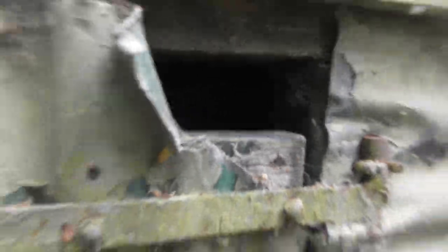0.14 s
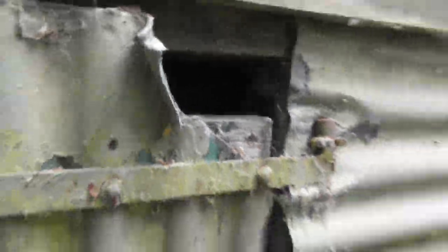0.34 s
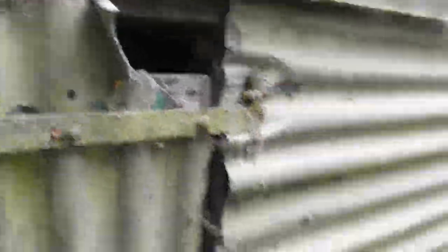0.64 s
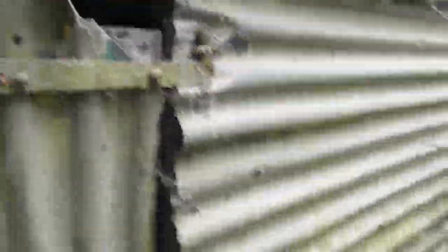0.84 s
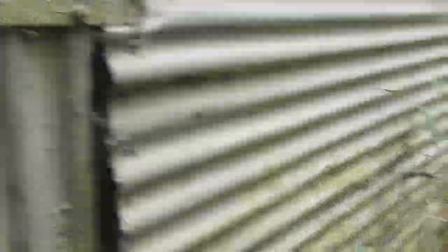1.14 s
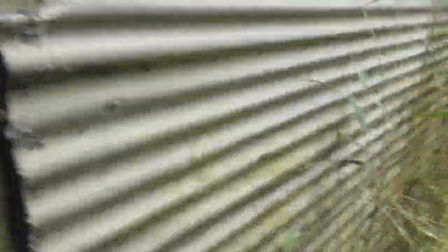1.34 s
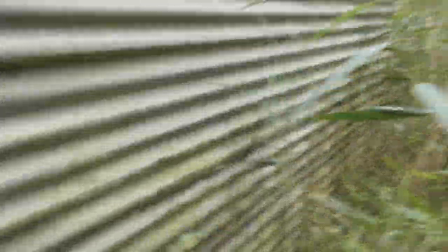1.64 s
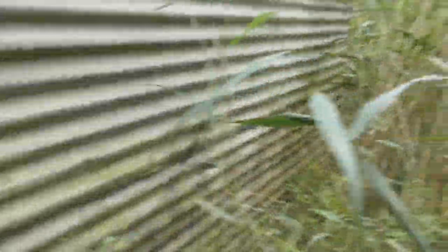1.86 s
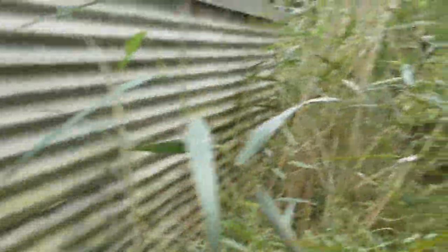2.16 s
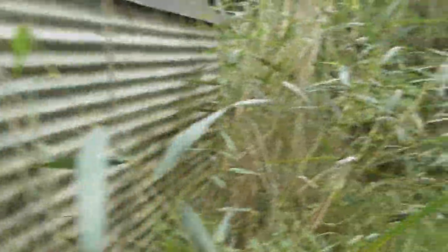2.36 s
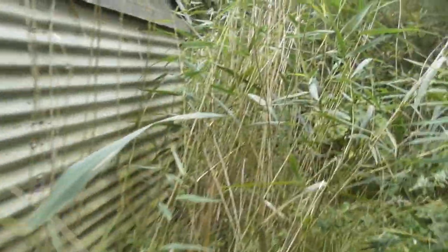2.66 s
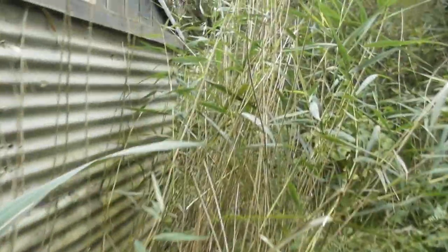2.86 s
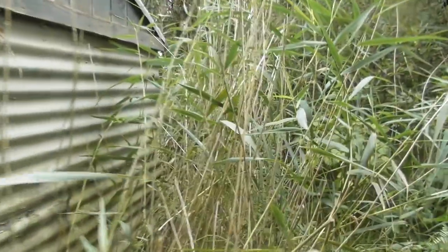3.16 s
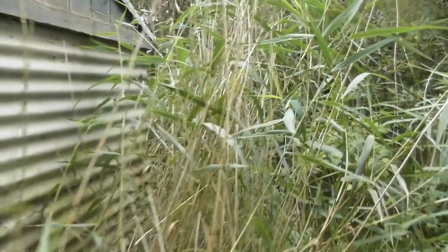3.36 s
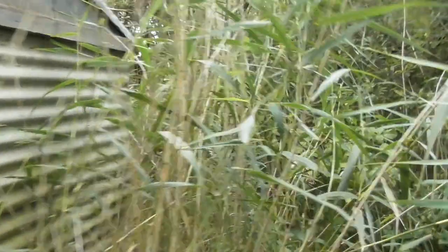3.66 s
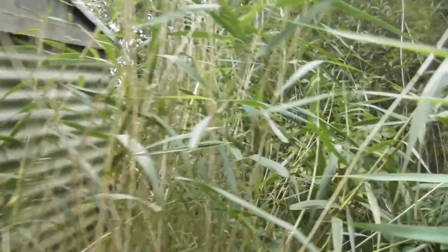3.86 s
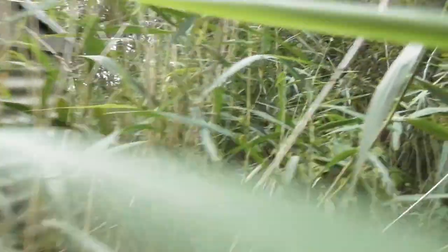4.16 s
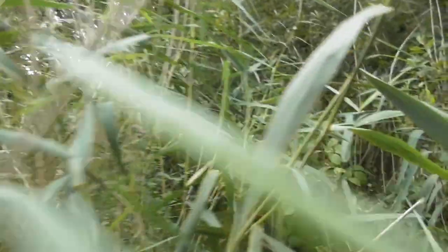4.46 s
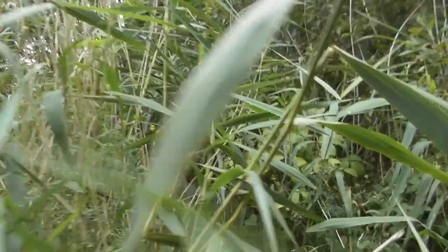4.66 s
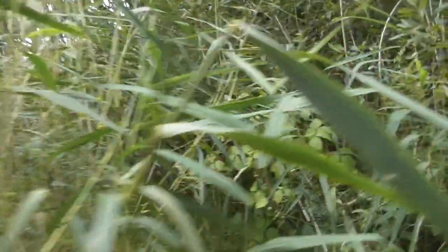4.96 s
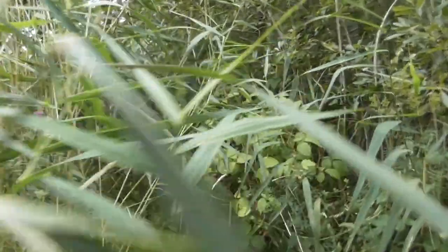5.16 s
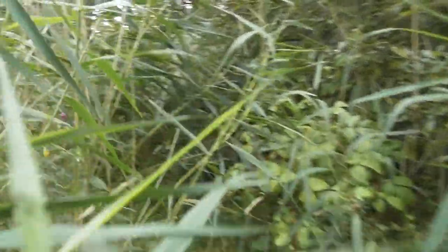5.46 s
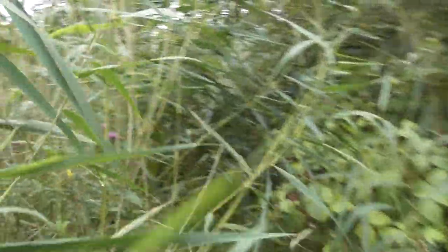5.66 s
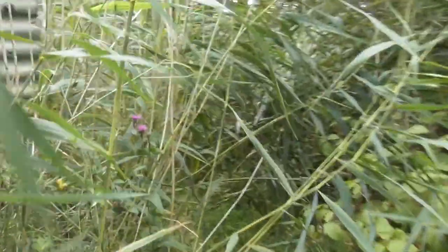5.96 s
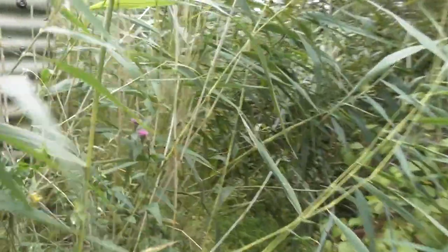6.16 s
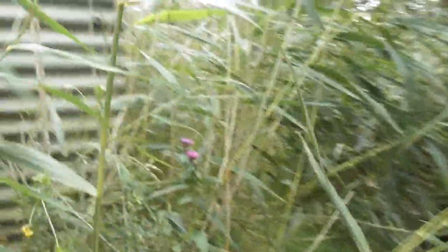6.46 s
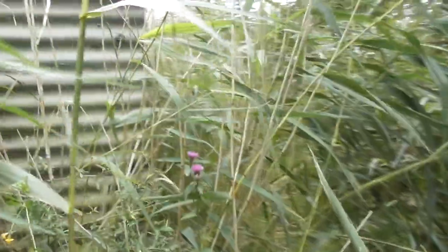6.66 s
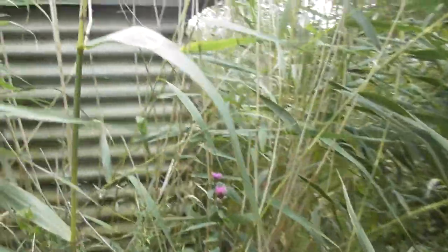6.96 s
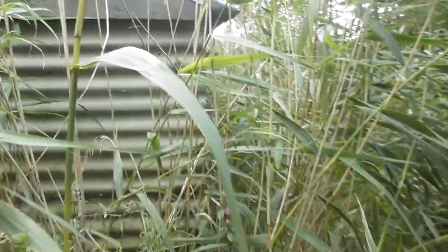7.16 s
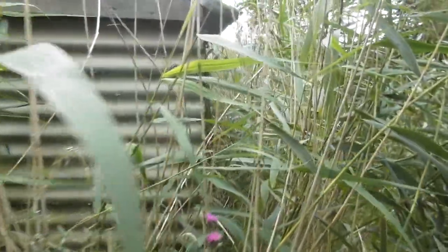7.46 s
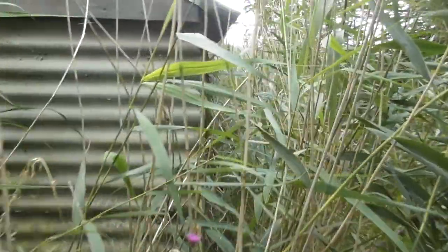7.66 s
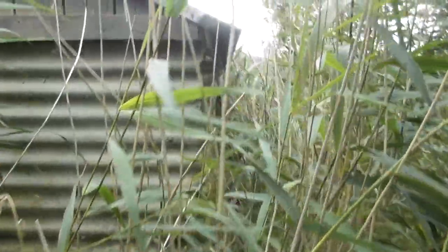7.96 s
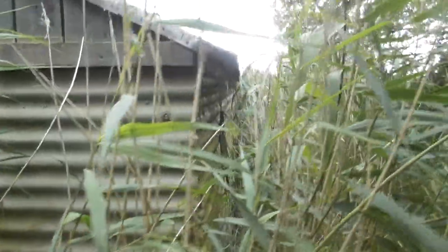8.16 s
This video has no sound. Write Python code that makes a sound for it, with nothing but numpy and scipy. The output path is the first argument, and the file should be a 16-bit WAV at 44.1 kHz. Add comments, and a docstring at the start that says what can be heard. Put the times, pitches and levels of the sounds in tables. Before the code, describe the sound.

Quiet wind wash and sparse clicks give way to dense, crisp reed rustling, with a burst of hard knocks and rumbling scrapes midway.

```python
"""Dry leaves rustle as someone wades through tall reeds: dense stick-slip impulses with leaf colours.
Ribbed blades rasp past, sheaths crackle, and dry leaves crack with damped pings.
Stalks tap the camera and excite its case modes; one drags across the housing, rumbling and groaning.
Beneath lies the soft wash of wind in distant plants: filtered noise whose level wavers."""
import sys
import numpy as np
from scipy import signal
from scipy.fft import rfft, irfft
from scipy.io import wavfile
from scipy.ndimage import uniform_filter1d

SR = 44100
rng = np.random.default_rng(int(sys.argv[2]) if len(sys.argv) > 2 else 0)


def unload_wav(signal):
    """Save mono or channel-first audio to the path in sys.argv[1] as 16-bit WAV at rate SR, clipped to [-1, 1]."""
    wavfile.write(
        sys.argv[1],
        SR,
        np.round(np.clip(np.atleast_2d(signal).T, -1, 1) * 32767).astype(np.int16),
    )


N = 366912
T, HZ = np.arange(N) / SR, np.fft.rfftfreq(N, 1 / SR)

# colour of hollow stems: (frequency [Hz], level [dB])
STEMS = [(100, 0), (200, 2), (400, 3), (750, 2), (1200, 0), (1650, -5.5), (2200, -1), (2900, -7.5),
         (4000, -2)]
# colour of leaf edges: (frequency [Hz], level [dB])
EDGES = [(8000, -26), (10000, -1.5), (11500, -6.5), (13500, -10.5), (16000, -12.5)]
# colour of a single ribbed blade: (frequency [Hz], level [dB])
BLADE = [(1500, -38), (1850, -5.5), (2350, -11.5), (2900, -18.5), (3900, -4), (5000, -6.5), (5700, 1),
         (7800, 8), (9000, 0.5), (10800, 0), (13900, -1.5), (16000, -11)]
# bright snap of a breaking or striking stalk: (frequency [Hz], level [dB])
SNAP = [(900, 15.5), (1550, -9), (2200, -9), (3000, -10.5), (3700, 3.5), (4600, -12.5), (7400, 3.5),
        (10000, -2.5), (16000, -7.5)]
# left port against the right; the sign flips while a stalk leans on the housing
FREE_POLARITY, PRESSED_POLARITY = 0.45, -0.3


def amp(db):
    """Level law: decibels to amplitude gain."""
    return 10 ** (np.asarray(db) / 20)


def evened(x):
    """Normalisation: scales a sound so that the mean of its channels has rms 1."""
    return x / np.sqrt(np.mean(x.mean(0) ** 2) + 1e-20)


def read(points):
    """Interpolation: each column of a table along log frequency."""
    hz, *columns = np.transpose(points)
    return [np.interp(np.log(HZ + 1), np.log(hz + 1), column) for column in columns]


def add(mix, s, sound):
    """Superposition: adds a sound to the mix at time s [s]."""
    part = mix[:, max(round(s * SR), 0):][:, :sound.shape[1]]
    part += sound[:, :part.shape[1]]


def wander(hz):
    """Low-passed noise: a slow random course of rms 1, with rates up to about hz."""
    x = irfft(rfft(rng.standard_normal(N)) / (1 + (HZ / hz) ** 4), N)
    return x / x.std()


def heard(drive, spectrum, ports=None):
    """Source-filter and coherence: colours two unrelated drives and blends them into two ports."""
    # microphone ports in the open: (frequency [Hz], likeness [0-1], left lead [rad], left-right [dB])
    open_ports = [(60, 0.25, -0.55, 5), (170, 0.07, -1.4, 4), (282, 1, -1.12, 4.5), (477, 0.75, -0.68, 1.5),
                  (1510, 0.87, -0.45, 2), (6000, 1, 0.16, 0), (8260, 0.79, -0.49, -1.5),
                  (9500, 0.96, -1.45, 10), (10700, 0.98, -2.17, -4), (12300, 0.5, -1.8, 3.5),
                  (14000, 0.7, -1.4, -2)]
    same, lead, balance_db = read(open_ports if ports is None else ports)
    same = np.clip(same, 0, 1)
    low_hz, high_hz = spectrum[0][0], spectrum[-1][0] * 1.2
    skirts = 1 / (1 + (low_hz / (HZ + 1)) ** 8) / (1 + (HZ / high_hz) ** 12)
    a, b = rfft(drive) * amp(read(spectrum)[0]) * skirts
    left = a * amp(balance_db / 2)
    right = (same * a + np.sqrt(1 - same ** 2) * b) * np.exp(-1j * lead)
    return evened(irfft(np.array([left, right * amp(-balance_db / 2)]), N))


def slips(per_s, spread_db, clump_db, clump_hz):
    """Stick-slip friction: random impulses of uneven size, whose strength swells in clumps."""
    struck = rng.random(N) < per_s / SR
    size = amp(spread_db * np.minimum(rng.exponential(1, N), 4)) * struck
    sign = np.sign(rng.standard_normal((2, N)))
    return size * amp(clump_db * wander(clump_hz)) * sign


def flicks(per_s, decay_s, depth):
    """Elastic release: a caught leaf springs free, so the slips surge at once and die away."""
    kicks = np.minimum(rng.exponential(1, N), 3) * (rng.random(N) < per_s / SR)
    return 1 + depth * signal.lfilter([1], [1, -np.exp(-1 / (decay_s * SR))], kicks)


def pushed(column, offset_db, slope):
    """Power addition: gain of one plant part, from steady effort plus each clump pushed aside."""
    # how hard the walker presses through the reeds: (time [s], effort [dB])
    effort_curve = [(0, -52), (.62, -56.5), (.92, -56.5), (1.36, -60.5), (1.47, -63), (1.7, -61),
                    (1.86, -52), (2.28, -60.5), (2.45, -56), (2.97, -54), (3.08, -43), (3.76, -41.5),
                    (4.15, -40.5), (4.71, -40.5), (4.77, -48.5), (4.92, -41.5), (5.33, -47), (5.52, -41),
                    (6.28, -38), (6.72, -43.5), (7.15, -41), (7.9, -42.5), (8.32, -49)]
    # a clump is pushed aside and springs back:
    # (peak time [s], length [s], blades [dB], stems [dB], leaf edges [dB], papery middle [dB])
    pushes = [(.105, 0.11, -47.5, -68, -72, -57), (0.33, 0.17, -50, -67, -67, -57),
              (0.496, 0.19, -48, -59.5, -60, -56), (0.64, 0.089, -48, -73, -60, -57),
              (0.757, 0.1, -60, -70, -57, -77), (1.184, .12, -56, -63, -67, -68),
              (1.37, 0.071, -58, -63, -67, -68), (1.773, 0.079, -47, -54.5, -55, -56),
              (1.9, 0.08, -61, -75, -56, -71), (2.207, 0.054, -47, -70, -56, -60),
              (2.42, .08, -49, -87, -61, -72), (2.565, 0.16, -57, -85, -58, -72),
              (2.643, 0.22, -50.5, -70, -59, -66), (3.103, 0.15, -43.5, -69, -65, -52),
              (3.27, 0.55, -41, -79, -55, -53), (3.57, 0.16, -40, -57, -64, -47),
              (3.897, 0.13, -37, -58, -51, -54), (4.03, 0.05, -46, -68, -47, -58),
              (4.173, 0.15, -40.5, -50, -57, -49), (4.474, 0.23, -38.5, -66, -50, -58),
              (4.94, 0.39, -40.5, -56, -51, -52), (5.103, 0.21, -52, -52, -54, -53),
              (5.386, 0.16, -58, -49.5, -53, -68), (5.497, 0.13, -35, -47, -48, -42.5),
              (5.652, 0.21, -36.5, -45, -53, -55), (5.745, 0.2, -38, -47, -52, -56),
              (5.786, 0.039, -34, -44, -42, -45), (5.853, 0.062, -37, -46.5, -41, -54),
              (5.96, 0.24, -47, -46.5, -47, -37.5), (6.135, 0.2, -34, -48, -55, -55),
              (6.182, .05, -32, -49, -37, -50), (6.26, 0.18, -34.5, -56, -41, -55),
              (6.452, 0.29, -53, -62, -47, -50), (6.99, 0.046, -43, -68, -48, -50),
              (7.14, .1, -40, -68, -50, -48), (7.466, 0.12, -52, -71, -48, -45),
              (7.645, 0.2, -46, -59, -54, -53), (7.776, 0.12, -43.5, -59, -67, -41.5),
              (7.865, 0.2, -38.5, -51.5, -49, -42), (8.066, 0.27, -44.5, -53.5, -66, -44),
              (8.275, 0.071, -43, -52.5, -55, -50)]
    walking_db = -37  # effort at which offset_db alone sets the part against the blades
    rise = 0.55  # share of a push spent building up
    t = T[::64]  # coarse time grid
    effort = np.interp(t, *np.transpose(effort_curve))
    power = amp(walking_db + offset_db + slope * (effort - walking_db)) ** 2
    for s, length, *levels in pushes:
        swell = np.interp(t, [s - rise * length, s, s + (1 - rise) * length], [0, 1, 0])
        power += amp(levels[column]) ** 2 * swell ** 1.43
    return np.interp(T, t, np.sqrt(power))


def air():
    """Filtered turbulence: wind in distant plants, its murmur and upper part wavering separately."""
    # colour of the distant plants: (frequency [Hz], level [dB])
    wash_colour = [(12, -48), (20, -8.5), (63, -4), (118, -10.5), (156, -9.5), (209, -8.5), (404, -4.5),
                   (533, -4.5), (701, -7.5), (993, -11.5), (1260, -14), (1600, -28), (2080, -56),
                   (3520, -120)]
    wash = heard(rng.standard_normal((2, N)), wash_colour)
    murmur = irfft(rfft(wash) / (1 + (HZ / 520) ** 6), N)
    upper = wash - murmur
    return amp(-55) * (murmur * amp(0.05 + 2.1 * wander(11)) + upper * amp(-1.0 + 1.1 * wander(21)))


def cracks(decay_s=0.0048, ring_s=0.0012):
    """Fracture: fibres part in a dying noise burst, and the stiff blade pings as a damped mode."""
    # a dry leaf cracks: (time [s], burst [dB], ping [dB], ping frequency [Hz])
    crack_events = [(0.645, -54, -37, 7500), (.7865, -43.5, -42, 7600), (1.2882, -36, -30, 6800),
                    (1.294, -47, -34, 7400), (1.3635, -53, -37, 7800), (2.361, -48, -33, 7500),
                    (2.9723, -40.5, -42, 7000), (4.7835, -37, -22, 7600), (4.796, -43, -23, 8000),
                    (4.8912, -48, -14, 7160), (5.8255, -34, -24, 7550), (6.826, -56, -19, 6600)]
    burst, ping, t = np.zeros((2, N)), np.zeros((2, N)), np.arange(2000) / SR
    for s, burst_db, ping_db, hz in crack_events:
        add(burst, s, amp(burst_db) * np.exp(-t / decay_s)[None])
        tone = np.exp(-t / ring_s) * np.sin(2 * np.pi * hz * t)
        add(ping, s, amp(ping_db) * tone[None])
    return ping + burst * heard(rng.standard_normal((2, N)), SNAP)


def groan(length, db):
    """Frequency modulation: the uneven hum of a stalk, rising as one rub bends it further."""
    t = np.arange(0, length, 1 / SR)
    unevenness = uniform_filter1d(rng.standard_normal(SR), size=150)[:len(t)]
    hz = (200 + 2230 * t) * (1 + 1.2 * unevenness)  # start [Hz] and rise [Hz/s]
    hum = np.sin(np.pi * t / length) * np.sin(2 * np.pi * np.cumsum(hz) / SR)
    return 2 * amp(db - 7) * hum * np.array([[PRESSED_POLARITY], [1]])


def drag():
    """Stick-slip on a shell: a stalk judders along the housing in bumps, nearly opposed at the ports."""
    # a stalk drags over the housing: (start [s], length [s], level [dB])
    rubs = [(4.221, 0.028, -31.5), (4.25, 0.066, -39), (4.338, 0.058, -34.5), (4.397, 0.082, -37.5),
            (4.505, .02, -39), (4.546, 0.049, -36.5), (4.588, 0.058, -32), (4.66, 0.025, -32),
            (4.71, 0.022, -30.5), (4.776, 0.047, -45.5), (4.832, 0.066, -38.5), (4.907, 0.072, -51)]
    # colour of the rubbed housing: (frequency [Hz], level [dB])
    housing = [(24, -47), (40, -15), (97, -1.5), (190, -4), (226, 1), (354, -4.5), (509, -10.5),
               (732, -8.5), (949, -15), (1030, -10.5), (1570, -34), (2500, -31), (3250, -33), (5500, -120)]
    # the ports while rubbed: (frequency [Hz], likeness [0-1], left lead [rad], left-right [dB])
    touched = [(60, 0.41, 2.4, -7.5), (300, 0.4, 2.87, -4.5), (840, 0.77, 2.53, -3.5),
               (2000, 0.5, 3.2, -1.5)]
    attack_s, release_s = 0.011, 0.012
    presses = []
    for s, length, db in rubs:
        onset = np.clip((T - s) / attack_s, 0, 1)
        release = np.exp(-np.maximum(T - s - length, 0) / release_s)
        presses.append(amp(db) * onset * release)
    pressure = np.max(presses, axis=0)
    bumps = flicks(per_s=65, decay_s=0.0037, depth=0.66)
    judder = bumps * slips(per_s=900, spread_db=1.0, clump_db=1.0, clump_hz=60)
    rumble = amp(-0.5) * heard(judder, housing, touched)
    stalk = amp(-13.5) * heard(judder, STEMS, touched)  # the hollow stalk rattles with each bump
    # leaf edges graze the left port more than the right
    grazes = slips(per_s=4400, spread_db=0, clump_db=4.5, clump_hz=70)
    scratch = amp([[-11], [-17]]) * heard(grazes, EDGES)
    out = pressure * (rumble + stalk + scratch)
    for s, length, db in rubs:
        add(out, s, groan(length, db))
    return out


def taps(snap_s=0.0013, ring_db=-3, low_cut_hz=100):
    """Modal impact: each tap is a bright snap and a brief ring of the camera case."""
    # a stalk taps the camera:
    # (time [s], snap [dB], knock [dB], ring pitch factor, ring length factor, left-right [dB])
    tap_events = [(.865, -53, -39, 0.92, 1.1, -8), (1.12, -29.5, -34, 0.91, 1.5, 0),
                  (1.2716, -41, -38, 0.84, 1, -3), (1.2807, -19, -22, 1.09, 1.6, 13),
                  (1.2836, -29, -43, 1.2, 1.2, 10), (1.3205, -23.5, -21.5, 1.03, 1.16, 7),
                  (1.555, -38.5, -34, 1.08, 1.05, 0), (1.6553, -54, -34.5, 0.96, 0.62, 1),
                  (1.657, -56, -36.5, 2.4, 0.54, 4), (1.71, -37, -32.5, 1.06, 1.2, 5),
                  (1.772, -46, -34.5, 1.05, 1.9, 9), (3.709, -30, -36, 1.82, 0.76, -6),
                  (4.218, -19.5, 5, 0.59, .22, -1), (4.2205, -18, -11, 0.2, 2.2, -2.5),
                  (4.287, -47, -22.5, 0.29, 2.6, -6), (4.354, -25, -26, 1.55, .62, -2),
                  (4.374, -26, -30, 1.4, .6, 5), (4.473, -36, -27, 0.79, 1.2, -6),
                  (4.625, -31, -19, .83, 0.55, 2), (4.68, -21, -22, 0.66, 0.46, -2),
                  (4.7048, -24, -13, 0.94, 2, 5), (4.7284, -17, -14, 1.27, 0.72, -2.5),
                  (4.8409, -26, -27.5, 0.23, 1.3, -8), (4.893, -42, -28, 0.39, 1, -2),
                  (5.018, -32, -27.5, 1.1, 0.79, 11), (5.139, -47, -32, 1, .78, -4),
                  (5.356, -31, -27.5, 2.46, 0.94, 15), (5.357, -44, -21.5, 0.99, 1.5, 10),
                  (5.3612, -48, -21, 1.4, 0.51, 19), (5.4432, -23, -15.5, 0.97, 0.086, 19.5),
                  (8.03, -44, -31.5, 1.15, .8, 8)]
    # case modes before the pitch and length factors: (frequency [Hz], level [dB], t60 [s])
    case_modes = [(116, -19, .07), (332, -13.5, 0.036), (716, -18.5, 0.082), (792, 4.5, 0.023),
                  (928, -10.5, 0.053), (1260, -31, 0.02), (2240, -11, 0.019), (3620, -14, .014)]
    out, t = np.zeros((2, N)), np.arange(4000) / SR
    snap = heard(rng.standard_normal((2, N)), SNAP)
    for s, snap_db, knock_db, pitch, length, pan_db in tap_events:
        polarity = PRESSED_POLARITY if 4.2 < s < 4.95 else FREE_POLARITY
        sides = np.array([[polarity * amp(pan_db / 2)], [amp(-pan_db / 2)]])
        ring = np.zeros(len(t))
        for hz, db, t60 in case_modes:
            ring += amp(db - 60 * t / (t60 * length)) * np.sin(2 * np.pi * hz * pitch * t)
        add(out, s, amp(knock_db + ring_db) * ring * sides)
        add(out, s, amp(snap_db) * np.exp(-t / snap_s) * snap[:, round(s * SR):][:, :len(t)])
    # high-pass: keeps the taps light in the deep bass
    return signal.sosfilt(signal.butter(1, low_cut_hz, "highpass", fs=SR, output="sos"), out)


def swipes():
    """Sliding friction: ribbed blades pass close by in short rasps, pulling on their stems."""
    # a blade slides past: (time [s], length [s], level [dB], stem weight [dB], edge softness [0-1])
    swipe_events = [(0.083, 0.025, -44.5, -14, 1), (0.437, 0.076, -49, -18, 0.46),
                    (0.57, 0.038, -40, -10.5, 1), (0.706, 0.031, -47.5, -23, 0.7),
                    (1.971, 0.16, -36.5, -26, 0.54), (2.128, 0.068, -36.5, -21, 0.57),
                    (4.568, 0.082, -36.5, -2, 0.6), (4.643, 0.04, -36, -17, 0.27),
                    (4.716, 0.015, -32.5, -14, 0.4), (4.832, 0.021, -33, -28, 0.8),
                    (4.878, 0.031, -30.5, -38, 0.8), (5.885, 0.04, -29.5, -11, 0),
                    (5.931, 0.02, -31, -8.5, 0.5), (5.957, 0.047, -32, -10.5, 0.2),
                    (6.091, 0.016, -26, -19.5, 0.57), (6.115, 0.013, -27, -29, .6),
                    (6.148, 0.018, -38, -4, 0.7), (7.409, .013, -35.5, -9.5, .4),
                    (8.02, 0.017, -41.5, -3, 0.7)]
    blade, stem = np.zeros((2, N))
    for s, length, db, weight_db, soft in swipe_events:
        ramp_s = length * max(soft, 0.05) / 2
        contact = np.clip(np.minimum(T - s, s + length - T) / ramp_s, 0, 1)
        blade += amp(db) * contact
        stem += amp(db + weight_db) * contact
    surge = flicks(per_s=400, decay_s=0.0025, depth=0.29)
    drive = surge * slips(per_s=6800, spread_db=0.3, clump_db=-2.5, clump_hz=150)
    return blade * heard(drive, BLADE) + stem * heard(drive, STEMS)


def crackle(per_s=22, decay_s=0.0038):
    """Random fracture: dry sheaths give way in tiny snaps, louder the harder the reeds are pushed."""
    kicks = np.minimum(rng.exponential(1, N), 2) * (rng.random(N) < per_s / SR)
    bursts = signal.lfilter([1], [1, -np.exp(-1 / (decay_s * SR))], kicks)
    snaps = heard(bursts * rng.standard_normal((2, N)), BLADE)
    return amp(-11.5) * pushed(0, offset_db=0, slope=1) * snaps


def leaf_ticks(per_s, level_db, ring_cycles, count):
    """Damped resonance: stiff leaf tips tick together, each with its own brief pitch."""
    t, out = np.arange(300) / SR, np.zeros((1, N))
    for hz in np.geomspace(5600, 8600, count):
        tick = np.exp(-t * hz / ring_cycles) * np.sin(2 * np.pi * hz * t)
        for when, size in rng.random((int(per_s * N / SR / count), 2)):
            add(out, when * N / SR, size ** 2 * tick[None])
    return amp(level_db) * evened(out)


def rustle():
    """Stick-slip excitation: slips sharing one surge shake blades, edges, papery sheaths and stems."""
    # colour of leaf blades: (frequency [Hz], level [dB])
    leaves = [(2650, -34.5), (4500, -33), (5150, -15), (5640, -4.5), (7390, 3.5), (8680, 0.5),
              (11100, -17.5), (12000, -20), (15600, -47), (22000, -120)]
    # colour of dry papery sheaths: (frequency [Hz], level [dB])
    paper_colour = [(2200, -5), (3000, -6), (3700, -0.5), (4400, 1), (5100, -2), (6500, -5)]
    # slope: dB per dB of effort
    leaf = pushed(0, offset_db=0, slope=1)
    stem = pushed(1, offset_db=-15, slope=0.71)
    edge = pushed(2, offset_db=-11, slope=0.98)
    paper = pushed(3, offset_db=-8, slope=1.16)
    surge = flicks(per_s=60, decay_s=0.014, depth=0.18)
    drive = surge * slips(per_s=12000, spread_db=1.5, clump_db=0.83, clump_hz=55)
    blades = amp(-0.52) * leaf * heard(drive, leaves)
    edges = amp(1.0) * edge * heard(drive[::-1], EDGES)  # the same slips with the two drives swapped
    paper_drive = surge * slips(per_s=7000, spread_db=2.0, clump_db=1.4, clump_hz=45)
    papery = amp(0.7) * paper * heard(paper_drive, paper_colour)
    stem_drive = surge * slips(per_s=3500, spread_db=1.5, clump_db=-0.1, clump_hz=40)
    stems = amp(4.0) * stem * heard(stem_drive, STEMS)
    ticks = leaf * leaf_ticks(per_s=340, level_db=-11.0, ring_cycles=18, count=20)
    return blades + edges + papery + stems + ticks


def scene():
    """Superposition: every source in the open air, without reverberation."""
    return air() + cracks() + drag() + taps() + swipes() + crackle() + rustle()


def record(dry):
    """Mid-side and clipping: sets stereo width by frequency, overloads at full scale, limits the band."""
    # side level by frequency, the middle treble near the centre: (frequency [Hz], side level [dB])
    width = [(1700, 1.5), (2200, -3.5), (2800, -25.5), (4000, -36.5), (5200, -33), (6600, -57),
             (7500, -7.5), (8600, -0.5)]
    mid = dry.mean(0)
    side = irfft(rfft(dry[0] - dry[1]) / 2 * amp(read(width)[0]), N)
    pair = np.clip([mid + side, mid - side], -1, 1)
    low_pass = signal.firwin(511, 16000, window=("kaiser", 9), fs=SR)
    return signal.oaconvolve(pair, low_pass[None], "same")


dry = scene()
out = record(dry)
unload_wav(out)
```